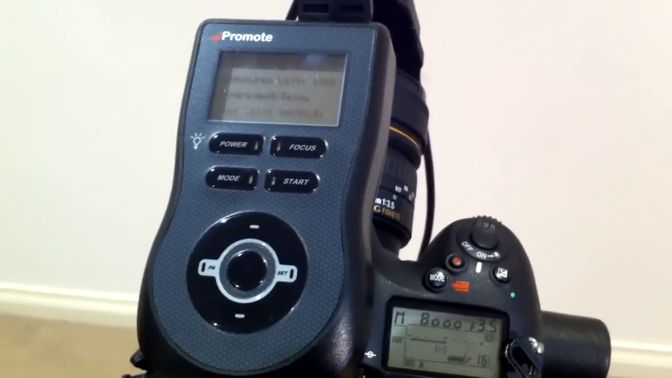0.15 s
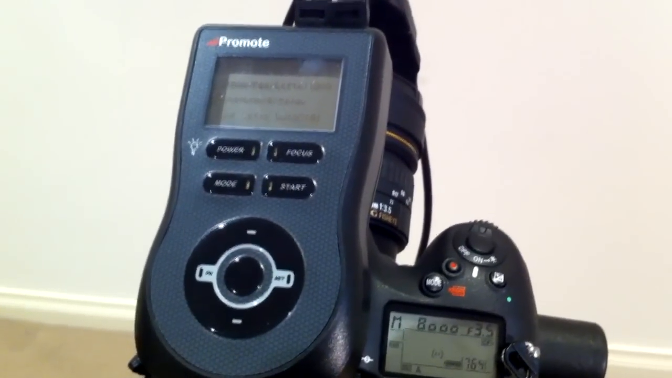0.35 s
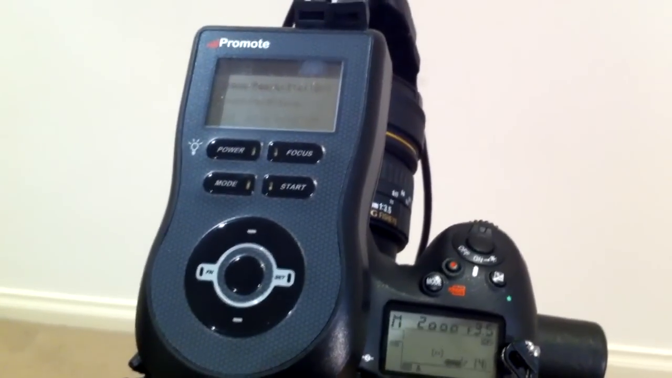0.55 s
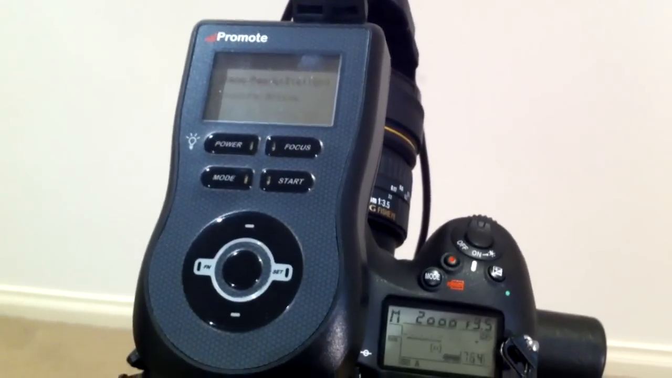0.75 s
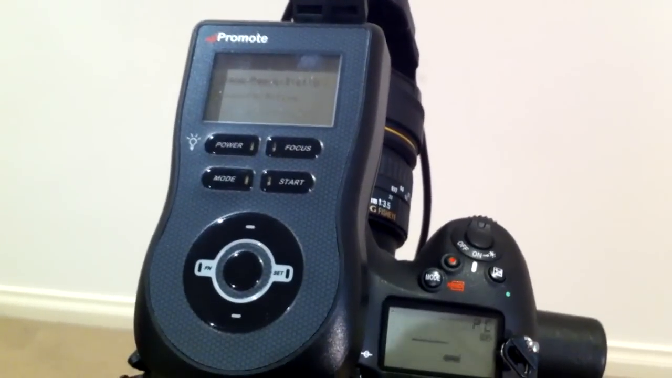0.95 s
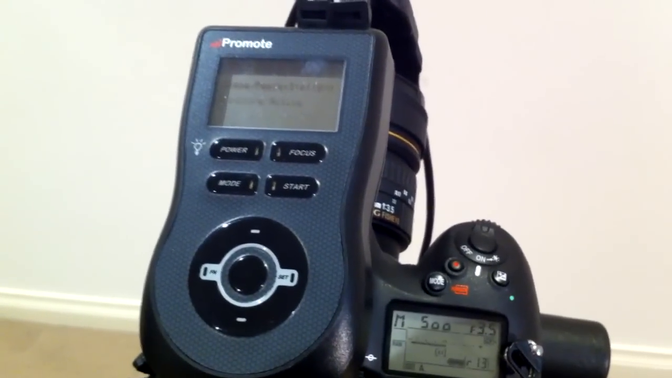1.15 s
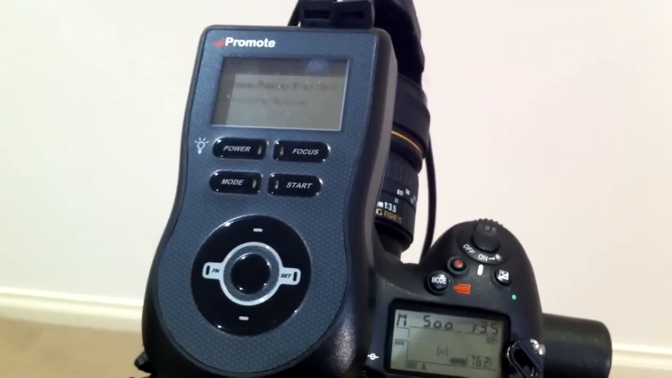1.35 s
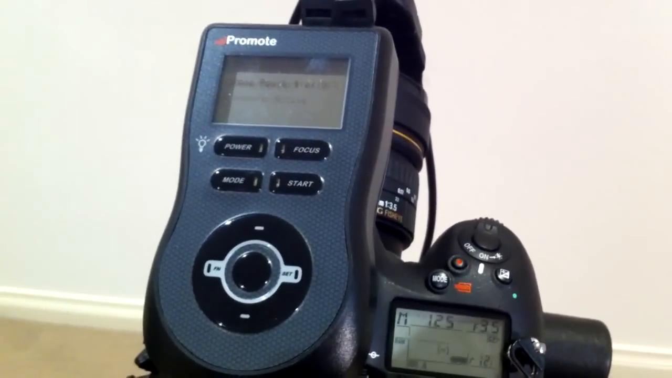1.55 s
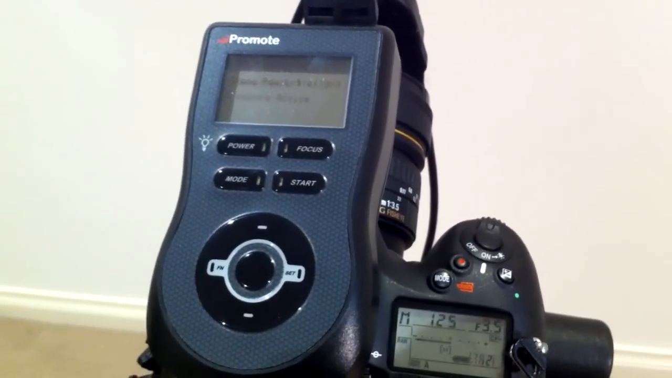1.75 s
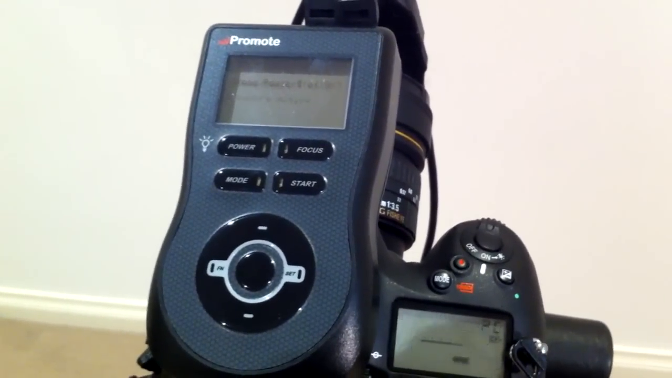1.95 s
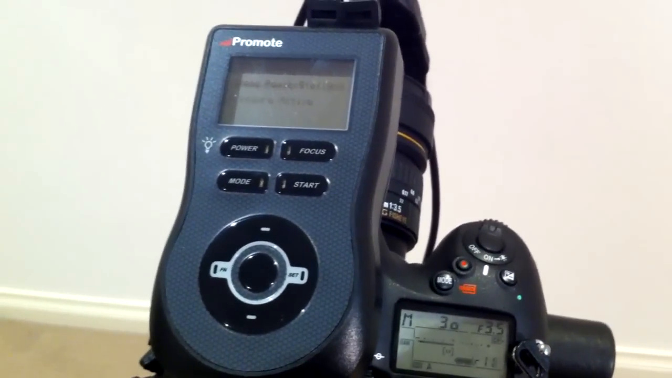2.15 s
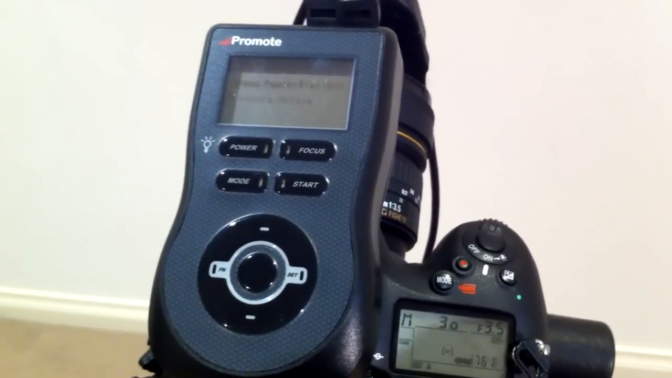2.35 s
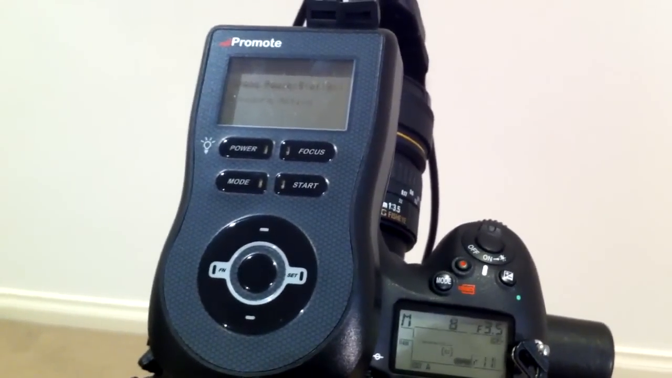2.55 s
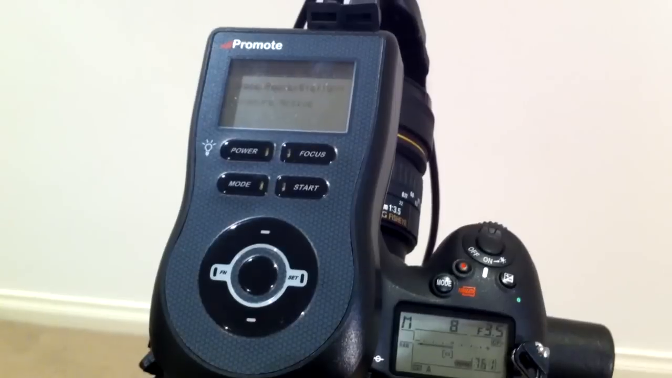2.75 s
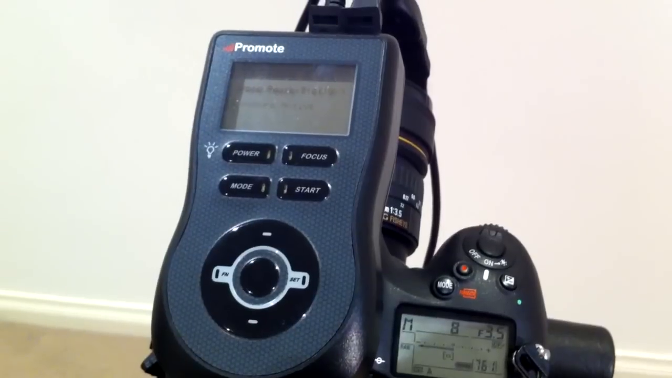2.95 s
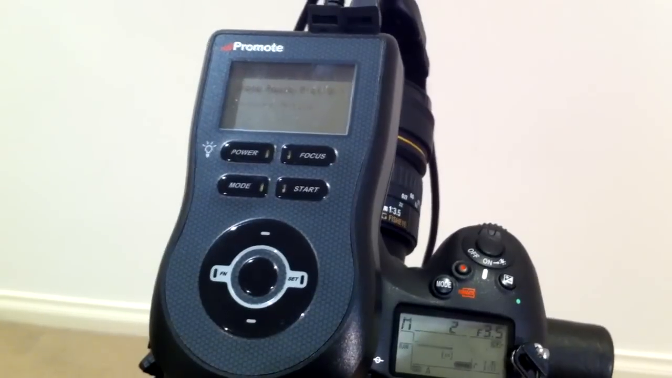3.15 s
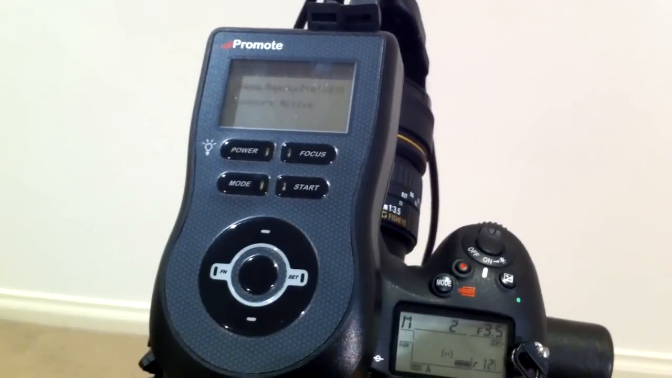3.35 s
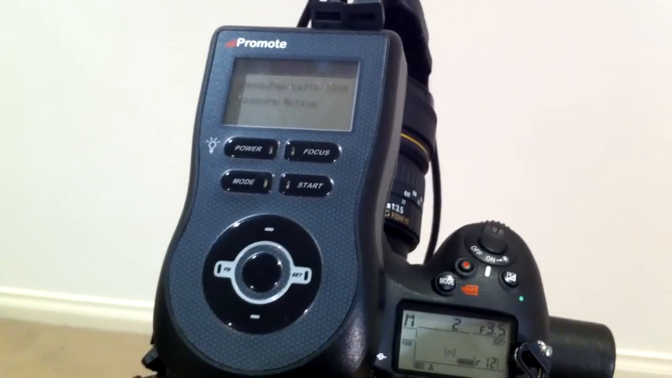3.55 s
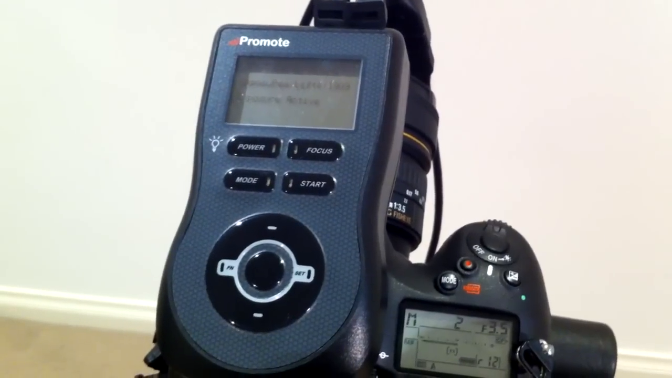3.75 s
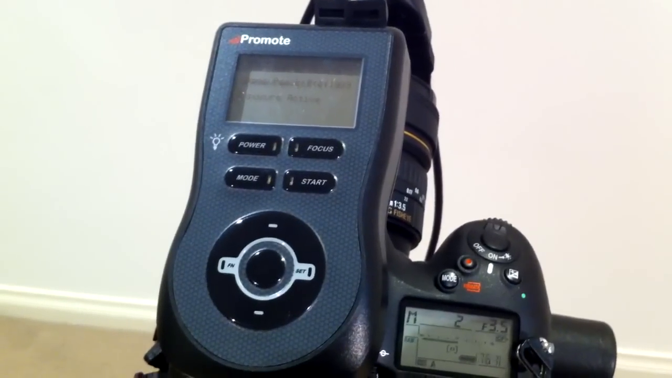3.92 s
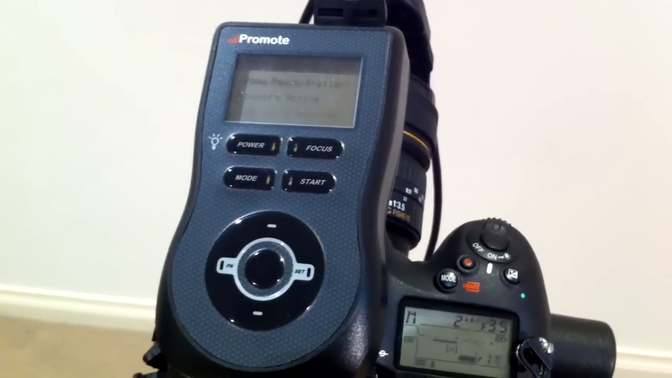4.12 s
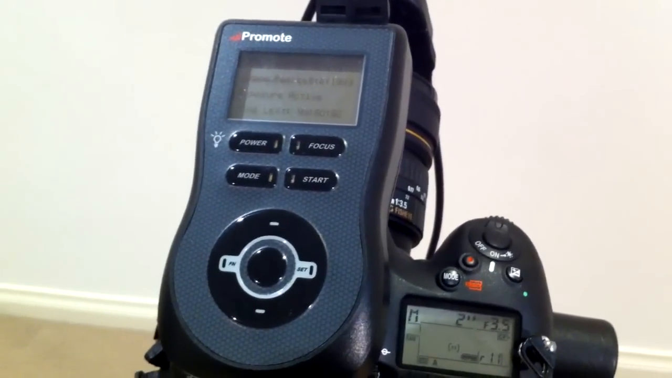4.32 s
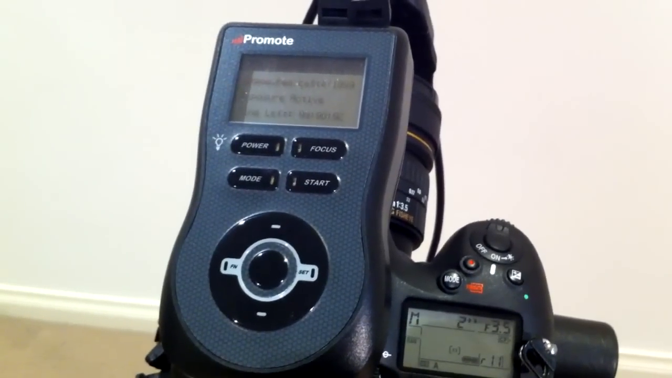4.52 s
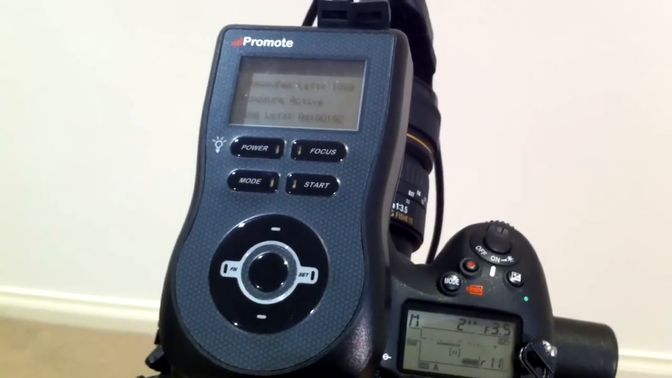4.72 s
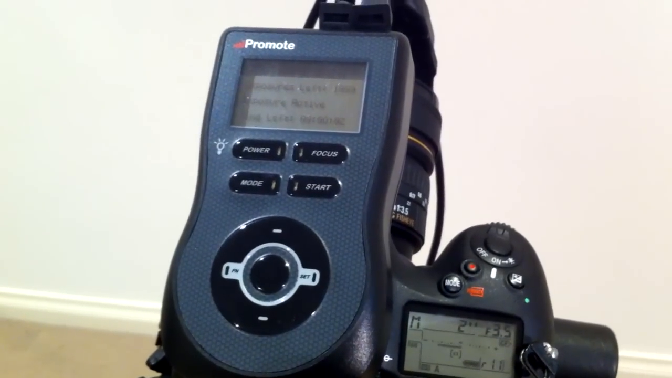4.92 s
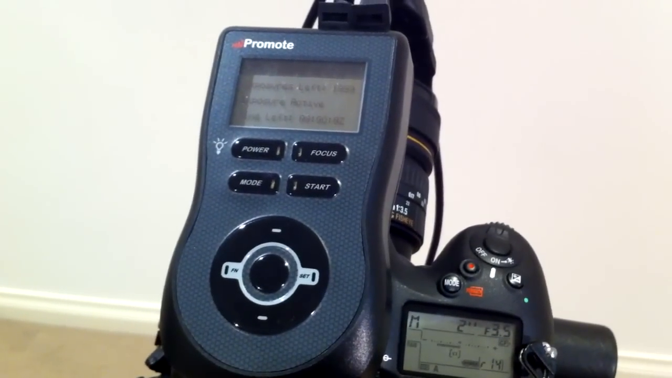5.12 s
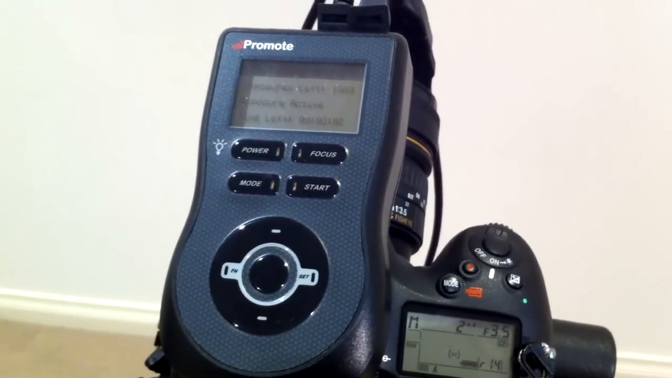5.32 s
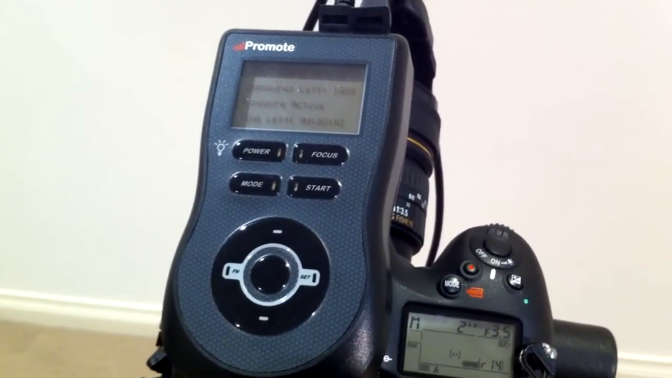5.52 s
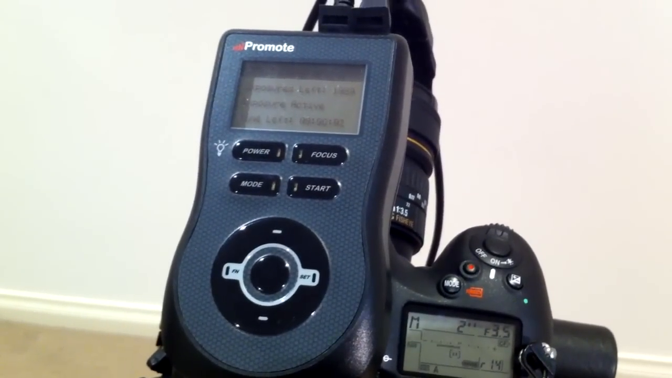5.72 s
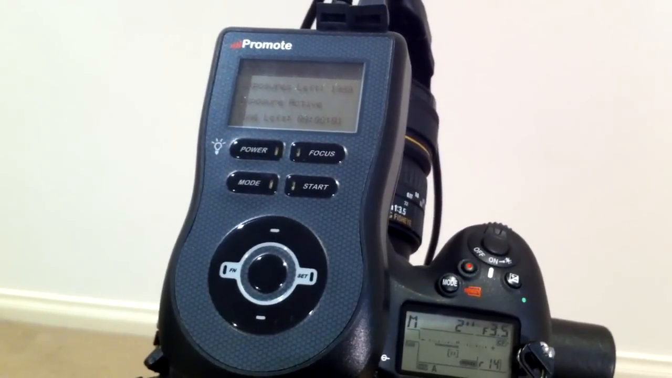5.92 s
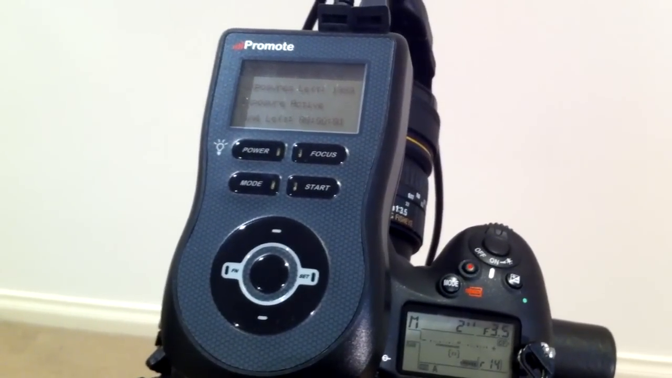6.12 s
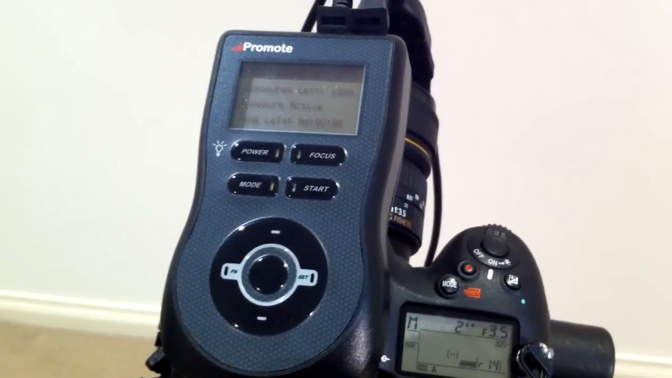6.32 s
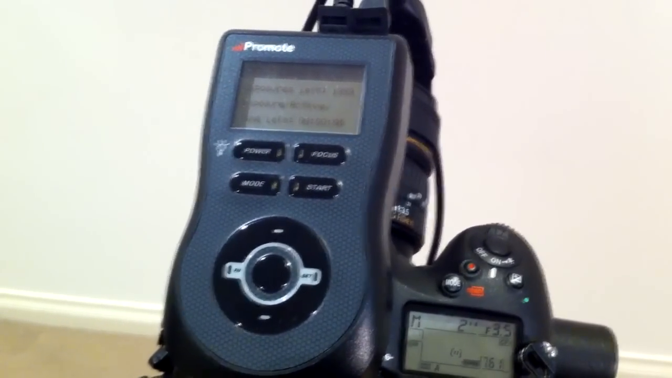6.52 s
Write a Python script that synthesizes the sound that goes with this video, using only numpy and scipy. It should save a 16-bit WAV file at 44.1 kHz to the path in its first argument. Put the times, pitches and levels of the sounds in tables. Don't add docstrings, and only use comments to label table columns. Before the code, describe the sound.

Sharp camera shutter and mirror clicks repeat with short room echoes over hiss, the final pair split by a two-second pause.

```python
import sys
import numpy as np
from scipy import signal
from scipy.fft import rfft, irfft, next_fast_len
from scipy.io import wavfile

SR = 44100
rng = np.random.default_rng(int(sys.argv[2]) if len(sys.argv) > 2 else 0)


def nominal_scale(level):
    x = np.asarray(level, float) / 20
    return 10 ** x


def pcm_store(signal):
    levels = np.round(np.clip(np.atleast_2d(signal), -1, 1) * 32767)
    wavfile.write(sys.argv[1], SR, levels.astype(np.int16).T)


N = 290114

# pitch_hz, level_db (per Hz)
HISS_COLOUR = [(14, -8), (50, -36), (100, -13.5), (170, -5), (350, -6.5), (800, -11.5), (4600, -15),
               (15700, -19)]
# start_s, length_s, level_db
RUMBLE_SWELLS = [
    (.45, 0.72, -75.5),
    (4.278, 0.38, -70),
    (4.737, 0.24, -71.5),
    (5.05, 0.11, -74),
]
RUMBLE_DB, SWELL_EDGE_S = -87.5, 0.097

# release_s, level_db, mirror_up_jolt_db, mirror_down_jolt_db (jolts felt by the microphone)
SHOTS_FIRED = [
    (0.1762, 0.5, -67, -74),
    (.677, 0.5, -51, -59),
    (1.1783, 0.5, -55, -66),
    (1.6819, 0.5, -61, -72),
    (2.1917, 0.5, -63, -83),
    (2.672, 0.5, -66, -56),
    (3.298, 0.5, -66, -66),
    (4.2, 0.5, -56, -70),
]
LONGEST_S, BRACKET = 1.997, 4
CURTAIN_LAG_S, CLOSING_DB = .0356, 0.08

# magnet lets go, latch, levers travel, mirror hits its stop and the body answers,
# it settles, first curtain starts and lands, brake.
# delay_s, level_db, centre_hz (of the blow), reach_octaves, ring_ratio (against a clean tap)
OPENING_CONTACTS = [(-.0056, -58.5, 6000, 1.3, 8.5), (-.0034, -52.5, 4930, 1.6, 3.4),
                    (-.0012, -26, 4470, 1.77, 0.41), (.002, -38, 1020, 1.4, 1.5),
                    (.0074, -41.5, 8050, 1.4, 5.2), (.0112, -26.5, 3800, 0.92, 0.48),
                    (0.0114, -28.5, 9150, 0.31, 0.7), (.0125, -30.5, 1880, 1.18, 0.9),
                    (0.0154, -30, 910, 1.02, 0.81), (.0205, -40.5, 3000, 3.1, 2.46),
                    (0.029, -36.5, 4000, 1.1, 1.4), (0.034, -28.5, 11900, .3, 0.51),
                    (.034, -35, 2520, 1.94, 0.77), (0.0426, -43, 5500, 0.89, 4.2)]
# second magnet lets go, second curtain runs and lands, gears wind,
# mirror unlatches, drops and bounces, cocking lever clicks home.
# delay_s, level_db, centre_hz, reach_octaves, ring_ratio
CLOSING_CONTACTS = [(-.008, -53.5, 4000, 1.4, 3), (-.0058, -31.5, 1500, .75, 0.8),
                    (-.0048, -41, 7100, 1.5, 1.4), (-.0015, -29.5, 3500, 1.2, 0.5),
                    (-.001, -36.5, 12000, .5, .7), (.005, -44.5, 4500, 2, 12),
                    (.016, -41.5, 1790, 1.3, 2.2), (0.026, -32.5, 13000, .7, .7),
                    (.026, -36.5, 2850, 0.9, 3.3), (0.0316, -32.5, 1060, 1.03, 1),
                    (.0345, -34.5, 2500, 1, 1.37), (.034, -37.5, 8400, 1.45, 2.7),
                    (.0405, -34.5, 3300, 1.1, 1.5), (.036, -36.5, 475, 0.43, 1.3),
                    (.049, -40, 2840, 1.55, 1.9), (.058, -41.5, 4020, 1.36, 3.7),
                    (0.0731, -32.5, 4200, 0.78, 0.75)]
# pitch_hz, width_hz, t60_s, level_db
BODY_PANELS = [(251, 90, 0.12, -12), (376.7, 106, 0.073, 3), (507, 98, 0.058, -7), (806, 400, 0.022, 1),
               (1136, 1040, 0.033, -2), (1640, 550, 0.012, 2), (2093, 1210, 0.023, 1),
               (3113, 1100, 0.033, -1.5), (4287, 2100, 0.03, 0.5), (5890, 4420, .018, 0),
               (8790, 2330, 0.022, 2.5), (11700, 5800, 0.02, 6), (14400, 1000, 0.01, -1)]
SPREAD_CYCLES = 1.2
# pitch_hz, level_db, t60_s
MIRROR_UP_RING = [(772, -58.5, 1.08), (768, -38, 0.063), (934, -44, 0.16), (1123, -39, 0.12),
                  (385, -56, 0.22), (1160, -56, 0.39), (3040, -72, 0.11), (2030, -44, .08),
                  (2326, -54.5, 0.084), (3030, -41.5, 0.074), (3440, -38.5, 0.082), (1224, -49, 0.26)]
# pitch_hz, level_db, t60_s
MIRROR_DOWN_RING = [(780, -61, 1.17), (808, -36.5, 0.11), (940, -45, 0.23), (511.8, -42, 0.22),
                    (1552, -48, 0.11), (2010, -57.5, 0.69), (538, -55, 0.3), (315.2, -54, 0.54),
                    (372.7, -45.5, 0.18), (1546, -59, 0.51), (3350, -42, 0.18), (2430, -42.5, 0.14),
                    (3044, -37.5, 0.068), (1596, -41, .09)]

# pitch_hz, t60_s
ROOM_DECAY = [(200, 0.34), (530, 0.46), (1400, 0.51), (3700, 0.48), (9700, 0.42), (16000, 0.26)]
# pitch_hz, level_db
WALL_COLOUR = [(150, 14.5), (350, 1), (800, -3), (2000, -1), (5000, 2), (10000, 2.5), (16000, 5)]


def unit(x):
    return x / np.sqrt(np.mean(x ** 2) + 1e-20)


def along(points, hz):
    f, v = np.transpose(points)
    return np.interp(np.log(hz + 1), np.log(f + 1), v)


def filtered(x, response):
    m = next_fast_len(x.shape[-1] + 4096)
    spectrum = rfft(x, m) * response(np.fft.rfftfreq(m, 1 / SR))
    return irfft(spectrum, m)[..., :x.shape[-1]]


def resonance(hz, width):
    return lambda f: 1j * f * width / (hz * hz - f * f + 1j * f * width)


def background():
    def hiss_response(f):
        comb = 1 + 0.21 * np.clip(f / 10000, 0, 1) * np.exp(-2j * np.pi * f / 1920)
        return nominal_scale(along(HISS_COLOUR, f)) * comb

    hiss = unit(filtered(rng.standard_normal(N), hiss_response))
    t = np.arange(N) / SR
    level = nominal_scale(RUMBLE_DB)
    for start, length, db in RUMBLE_SWELLS:
        to_edge = np.minimum(t - start, start + length - t)
        level = level + nominal_scale(db) * np.clip(to_edge / SWELL_EDGE_S + .5, 0, 1)
    band = resonance(295.6, 72)
    rumble = unit(filtered(rng.standard_normal(N), lambda f: band(f) ** 2))
    return nominal_scale(-67.0) * hiss + level * rumble


def shots():
    opens = [(s, db, up_db) for s, db, up_db, _ in SHOTS_FIRED]
    closes = []
    for k, (s, db, _, down_db) in enumerate(SHOTS_FIRED[::-1]):
        exposure = LONGEST_S / BRACKET ** k
        closes.append((s + CURTAIN_LAG_S + exposure, db + CLOSING_DB, down_db))
    return opens, closes[::-1]


def train(fired, contacts, modes, blow_s, alike, knock):
    out, t, long = np.zeros(N + SR), np.arange(3072) / SR, np.arange(SR) / SR
    hz, width, t60, part_db = np.transpose(BODY_PANELS)[..., None]
    f = np.fft.rfftfreq(4096, 1 / SR)
    panels = resonance(hz, width)(f) ** 2 * np.exp(-2j * np.pi * f * SPREAD_CYCLES / hz)

    habit = rng.standard_normal((len(contacts), len(BODY_PANELS), len(t)))
    grits = nominal_scale(2.9 * rng.standard_normal((len(contacts), 1, len(t))) - 2)
    tones = []
    for tone, level, fades in modes:
        wave = np.sin(2 * np.pi * (tone * long + rng.uniform()))
        tones.append(nominal_scale(level - 60 * long / fades) * wave)
    tones = np.array(tones)

    delay, level_db, centre_hz, reach, rings = np.transpose(contacts)[..., None, None]
    nearness = np.exp(-.5 * (np.log2(hz / centre_hz) / reach) ** 2)
    share = nominal_scale(level_db + part_db) * nearness * np.sqrt(SR / hz)
    shape = share * nominal_scale(-60 * t / (rings * t60)) * (1 - np.exp(-t / 0.00044))
    for s, db, _ in fired:
        fresh = rng.standard_normal(grits.shape)
        rattle = alike * habit + np.sqrt(1 - min(alike, 1) ** 2) * fresh
        rattle = rattle * grits
        rattle[..., 16] += knock
        bursts = irfft((rfft(shape * rattle, 4096) * panels).sum(axis=1))
        for late, burst in zip(delay.ravel(), bursts):
            out[round((s + late) * SR):][:len(burst)] += nominal_scale(db) * burst
        ring = nominal_scale(rng.normal(0, 1, len(modes))) @ tones
        ring = ring * (1 - np.exp(-long / 0.00062))
        part = out[round((s + blow_s) * SR):][:SR]
        part += nominal_scale(db) * ring[:len(part)]
    return out[:N]


def echoes():
    hz, t, z = signal.stft(rng.standard_normal(SR * 3 // 4), SR, nperseg=256)
    decay_db = along(WALL_COLOUR, hz)[:, None] - 60 * t / along(ROOM_DECAY, hz)[:, None]
    tail = signal.istft(z * nominal_scale(decay_db), SR, nperseg=256)[1]
    build_up = 1 - np.exp(-np.arange(len(tail)) / SR / 0.00041)
    return tail / np.linalg.norm(tail) * build_up


def room(x):
    out, step, lasting = np.zeros(N + SR), 1024, echoes()
    others = [echoes() for _ in range(5)]
    for k, start in enumerate(range(0, N, step)):
        piece = x[start:start + step]
        if np.abs(piece).max() > 1e-3:
            wet = signal.fftconvolve(piece, 0.3 * lasting + 0.6 * others[k % 5])
            out[start + 130:][:len(wet)] += wet
    return out[:N]


def jolts():
    out, u = np.zeros(N + SR), np.arange(4096) / SR / 0.0034
    push = u * (3 - 3 * u + u * u / 2) * np.exp(-u)
    opens, closes = shots()
    for s, _, jolt_db in opens + closes:
        out[round((s + .015) * SR):][:len(u)] += nominal_scale(jolt_db - 2.5) * push
    return out[:N]


def scene():
    opens, closes = shots()
    camera = train(opens, OPENING_CONTACTS, MIRROR_UP_RING, blow_s=0.0092, alike=0.92, knock=5.1)
    camera = camera + train(closes, CLOSING_CONTACTS, MIRROR_DOWN_RING, blow_s=.032, alike=0.83, knock=1.8)
    in_room = camera + nominal_scale(1.0) * room(camera)
    heard = nominal_scale(-0.6) * filtered(in_room, lambda f: (1j * f / (200 + 1j * f)) ** 4)
    return (heard + jolts() + background())[None]


def low_pass(x):
    return signal.sosfilt(signal.butter(12, 16810, fs=SR, output="sos"), x)


def record(dry):
    mix = dry - .0001
    return low_pass(mix)


dry = scene()
out = record(dry)
pcm_store(out)
```